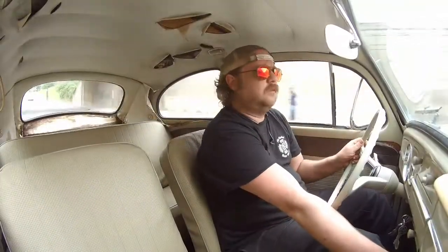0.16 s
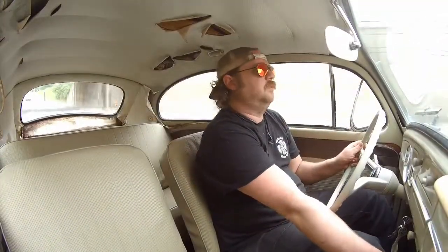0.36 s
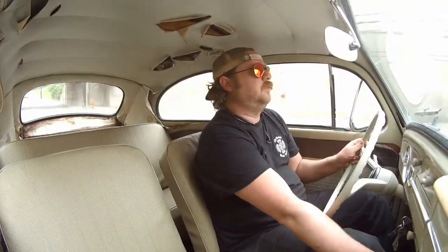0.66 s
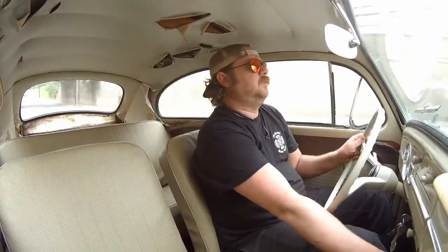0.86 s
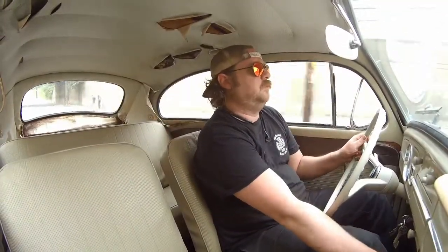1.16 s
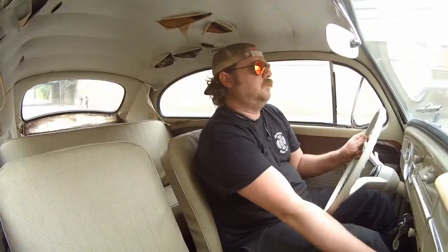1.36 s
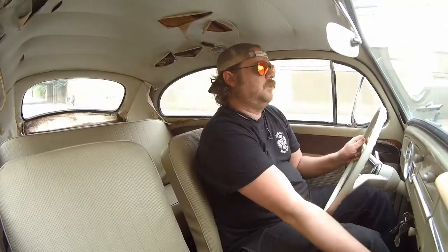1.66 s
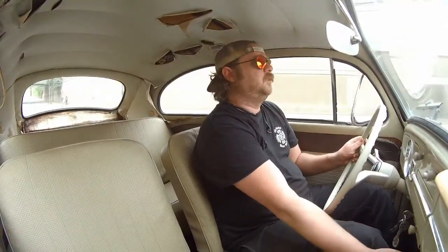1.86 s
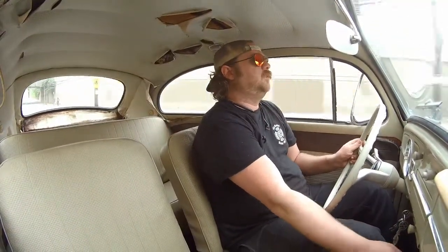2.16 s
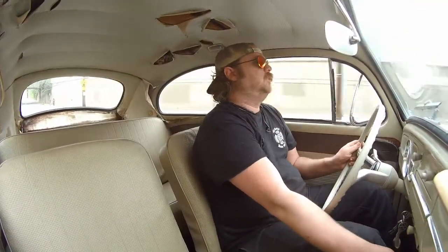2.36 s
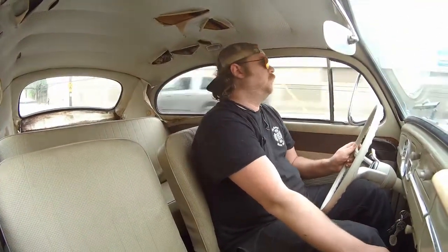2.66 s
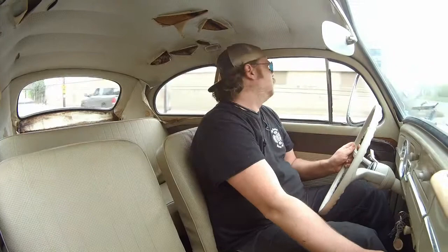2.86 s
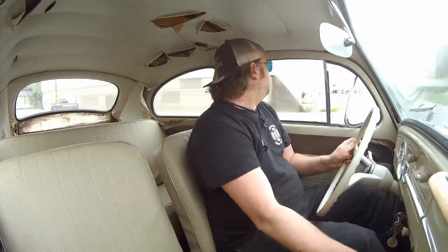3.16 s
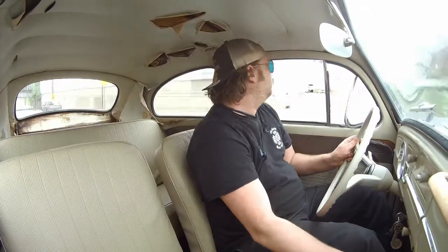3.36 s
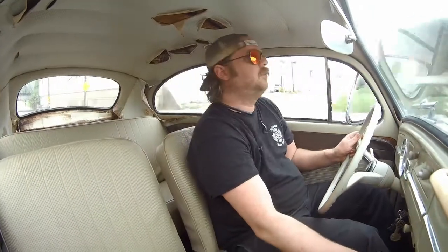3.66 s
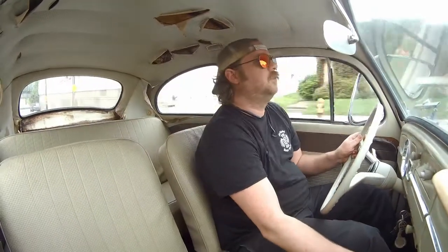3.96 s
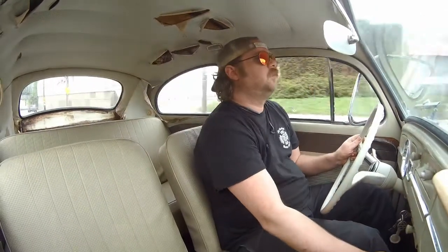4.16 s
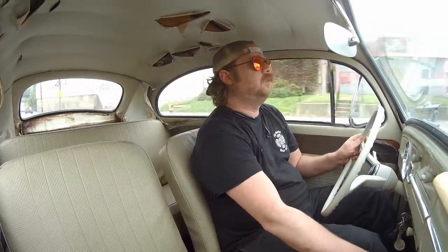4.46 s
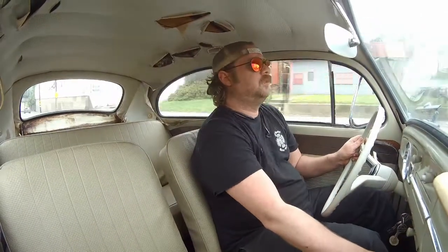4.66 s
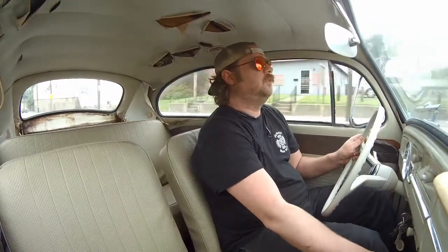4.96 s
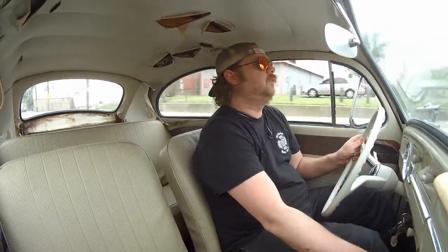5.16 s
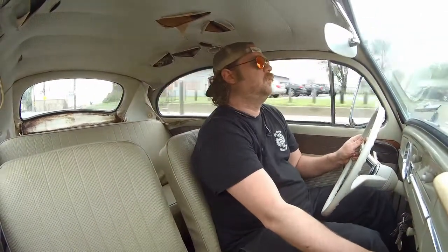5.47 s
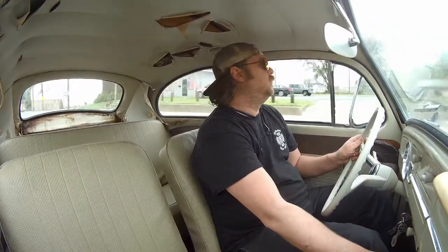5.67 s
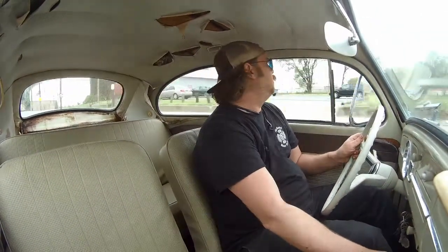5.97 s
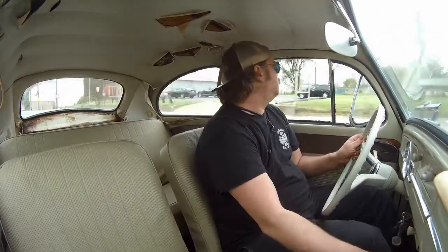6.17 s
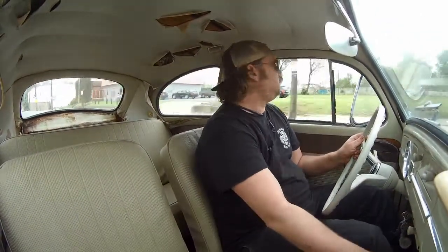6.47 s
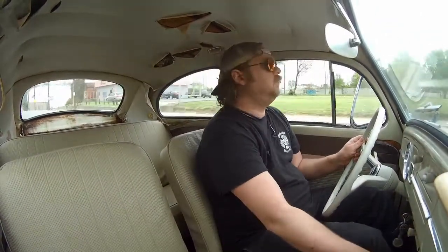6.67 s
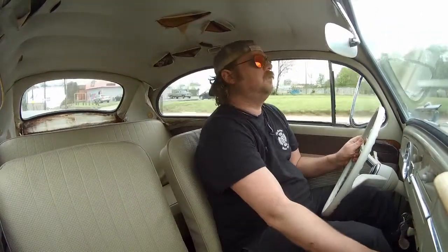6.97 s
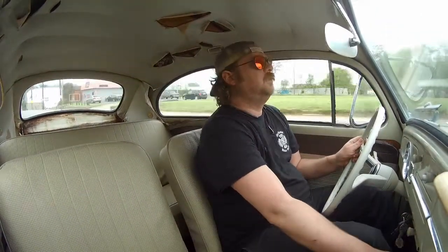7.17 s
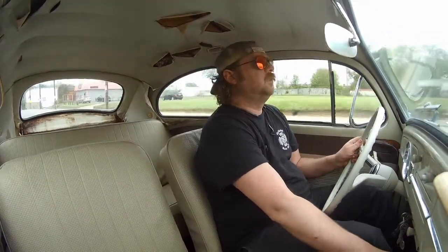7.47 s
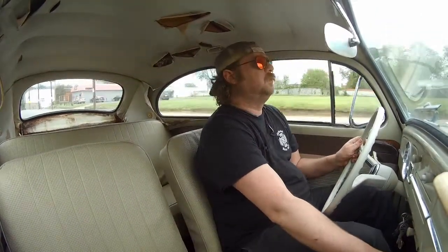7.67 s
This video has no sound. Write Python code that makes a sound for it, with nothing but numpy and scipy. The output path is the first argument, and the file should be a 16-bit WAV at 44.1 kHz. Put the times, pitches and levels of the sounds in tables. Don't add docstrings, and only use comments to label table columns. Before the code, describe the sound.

Inside a small old car at speed, an air-cooled engine drones and eases lower beneath tyre roar, wind hiss and booming bumps.

```python
import sys
import numpy as np
from scipy import signal
from scipy.fft import rfft, irfft, next_fast_len
from scipy.io import wavfile
from scipy.ndimage import uniform_filter1d

SR = 44100
rng = np.random.default_rng(int(sys.argv[2]) if len(sys.argv) > 2 else 0)


def level_to_linear(level):
    exponent = np.asarray(level, float) / 20
    return 10 ** exponent


def digitize_waveform(pressure):
    field = np.atleast_2d(pressure).T
    bounded = np.clip(field, -1, 1)
    quanta = np.round(bounded * 32767).astype(np.int16)
    wavfile.write(sys.argv[1], SR, quanta)


N = 345303

# time_s, cycle_hz
REVS = [
    (0.0, 32.36),
    (1.79, 32.87),
    (2.53, 32.4),
    (3.12, 31.41),
    (4.14, 29.6),
    (5.69, 29.18),
    (6.76, 27.61),
    (7.39, 26.5),
    (7.83, 26.04),
]


def curve(table):
    time_s, value = np.transpose(table)
    return np.interp(np.arange(N) / SR, time_s, value)


def swells(rows):
    t = np.arange(0, N + 64, 64) / SR
    total = sum(height * np.exp(-((t - s) / max(half_s, .01)) ** 2) for s, height, half_s in rows)
    return np.interp(np.arange(N) / SR, t, total)


def walk(rate_hz):
    k = max(int(SR / rate_hz / 64), 1)
    held = np.repeat(rng.standard_normal(N // (64 * k) + 2), k)
    slewed = uniform_filter1d(uniform_filter1d(held, k), k)
    return 1.3 * np.interp(np.arange(N) / 64, np.arange(len(held)), slewed)


def unit_rms(x):
    return x / np.sqrt(np.mean(x ** 2))


def noise(colour, shared_db, flicker_db, flicker_hz):
    size = next_fast_len(N)
    octave = np.log2(np.maximum(np.fft.rfftfreq(size, 1 / SR), 1))
    hz, db = np.transpose(colour)
    colour_db = np.interp(octave, np.log2(hz), db, -200, -200)
    spectrum = rfft(rng.standard_normal(size)) * level_to_linear(colour_db)
    out = 0
    for centre in np.arange(np.floor(np.log2(hz[0])), np.log2(hz[-1]) + 1):
        share = np.cos(np.pi / 2 * np.clip(octave - centre, -1, 1)) ** 2
        octave_band = irfft(spectrum * share, size)[:N]
        out = out + octave_band * level_to_linear(flicker_db * walk(flicker_hz))
    return unit_rms(out * level_to_linear(shared_db))


def band(hz, width_hz):
    edges_hz = [hz - width_hz / 2, hz + width_hz / 2]
    sos = signal.butter(1, edges_hz, "band", fs=SR, output="sos")
    return unit_rms(signal.sosfilt(sos, rng.standard_normal(N)))


def even(x, share):
    return unit_rms(x / uniform_filter1d(x ** 2, SR // 12) ** (share / 2))


def cycle_phase():
    return 2 * np.pi * np.cumsum(curve(REVS) * (1 + .0006 * walk(12))) / SR


def pedal():
    # down_s, up_s, travel_s, level_over_coasting_db
    pulls = [
        (-1, 2.84, 0.19, -0.5),
        (4, 5.79, .15, -0.5),
    ]
    # centre_s, level_db, half_length_s
    take_up = [(4.17, -7, 0.096)]
    t = np.arange(N) / SR
    throttle = 0
    engine_db = 0.37 + swells(take_up)
    for down_s, up_s, travel_s, pull_db in pulls:
        press = np.clip(np.minimum(t - down_s, up_s - t) / travel_s + .5, 0, 1)
        throttle = throttle + press
        engine_db = engine_db + press * pull_db
    return np.clip(throttle, 0, 1), engine_db


def engine(turn):
    # multiple, pull_fast_db, coast_fast_db, pull_slow_db,
    # coast_slow_db
    multiples = [(2, -37, -34, -30, -26), (3, -38, -37, -36, -36), (4, -25, -24.5, -27.5, -23),
                 (5, -41, -45, -26, -33), (6, -31, -38, -28.5, -35), (7, -38, -39, -27.5, -37),
                 (8, -50, -34, -33.5, -34), (9, -29.5, -53, -32.5, -48), (10, -49, -47, -42, -44),
                 (11, -43, -46, -53, -47), (12, -41, -43, -40, -44), (13, -40, -45, -37, -44),
                 (14, -51, -52, -40, -49), (15, -44, -52, -49, -42), (16, -47, -48, -42, -46),
                 (17, -42, -55, -56, -46), (18, -50, -51, -42, -50), (19, -41, -54, -47, -53),
                 (20, -42, -49, -47, -48), (21, -42, -42, -46, -51), (22, -45, -54, -45, -52),
                 (23, -44, -56, -43, -55), (24, -52, -50, -45, -45), (25, -45, -53, -53, -54),
                 (26, -48, -51, -46, -52), (28, -56, -43, -42, -54), (29, -50, -56, -47, -54),
             (30, -46, -56, -50, -44), (31, -51, -56, -48, -56), (35, -60, -58, -58, -47),
             (36, -60, -58, -58, -49), (40, -60, -54, -53, -57), (43, -58, -60, -52, -62),
             (44, -57, -60, -56, -48)]
    # mode_hz, width_hz, level_db
    bulkhead = [(228, 22, 6.5), (210, 9, -6)]
    # centre_s, level_db, half_length_s
    balanced = [(4.35, -11, .33)]
    slow_hz, fast_hz = 29.5, 30.1
    throttle, engine_db = pedal()
    fast = np.clip((curve(REVS) - slow_hz) / (fast_hz - slow_hz), 0, 1)
    coast, slow = 1 - throttle, 1 - fast
    share = np.array([throttle * fast, coast * fast, throttle * slow, coast * slow])
    out = 0
    for k, *stage_db in multiples:
        panel_db = sum(top_db / (1 + (2 * (k * curve(REVS) - mode_hz) / width_hz) ** 2)
                       for mode_hz, width_hz, top_db in bulkhead)
        if k == 4:
            panel_db = panel_db + swells(balanced)
        scatter_db = (.4 + .08 * min(k, 18)) * walk(14)
        gain = level_to_linear(np.array(stage_db)) @ share * level_to_linear(panel_db + scatter_db)
        out = out + gain * np.sin(k * turn - .55 * k * k + .02 * min(k, 18) * walk(14))
    return np.sqrt(2) * out * level_to_linear(engine_db)


def dynamo(turn):
    # multiple, level_db
    whine = [(104.7, -64)]
    # centre_s, level_db, half_length_s
    charging = [
        (4.07, 8, .16),
        (4.55, 7, .09),
        (4.9, 4, .1),
    ]
    _, engine_db = pedal()
    out = 0
    for k, db in whine:
        gain = level_to_linear(db + swells(charging) + 3.5 * walk(5))
        out = out + gain * np.sin(k * turn + .8 * walk(30))
    return np.sqrt(2) * out * level_to_linear(engine_db)


def air():
    # time_s, level_db
    flow = [(0, -2), (.5, -1.5), (1.6, -1), (2.05, -1.4), (2.6, 0), (3.5, -1), (4.3, 0.7), (4.95, -1.3),
            (6, 1), (7, -0.4), (7.5, -0.2), (7.83, -0.5)]
    # centre_s, level_db, half_length_s
    rises_and_dips = [(-0.0, 0.5, 0.015), (0.11, 3, 0.057), (0.18, -1, 0.073), (0.6, -3, 0.015), (0.87, 1.6, 0.024),
                      (1.12, -3.5, 0.021), (1.4, 2.5, 0.066), (1.52, -2, 0.029), (1.71, 1.5, 0.079),
                      (2.11, -3.5, 0.034), (2.81, -1.7, 0.054), (3.0, 1.2, 0.04), (3.14, 2.4, 0.018),
                      (3.18, -1, 0.023), (3.3, 1, 0.074), (3.53, -1, 0.12), (3.97, 1.2, 0.11), (4.46, 1.2, 0.099),
                      (4.76, -1.0, 0.07), (4.94, -2.5, 0.051), (5.22, 1.5, 0.017), (5.71, -1.7, 0.016),
                      (6.17, -2, 0.013), (6.27, 1.0, 0.063), (6.44, -2.4, 0.021), (6.64, 1, 0.043),
                      (6.72, -2, 0.031), (7.21, -2.5, 0.015), (7.41, 2.1, 0.075), (7.76, -0.5, 0.041)]
    # centre_s, level_db, half_length_s
    side_wind = [
        (3.0, 1.2, 1),
        (4.2, 0.8, .4),
    ]
    flow_db, brief_db = curve(flow), swells(rises_and_dips)
    roar_db = -28 + flow_db + 1.1 * brief_db
    hiss_db = -45 + flow_db + brief_db + swells(side_wind)
    return roar_db, hiss_db


def tyre_roar(turn, gust, roar_db):
    # hz, level_db_per_hz
    roar_colour = [(59, -33), (100, -10.5), (134, -3), (168, -6.5), (231, -7.5), (339, -11), (417, -9.5),
                   (582, -15), (651, -15), (843, -14.5), (1270, -20), (1620, -31.5), (1900, -39.5),
                   (2470, -58), (4180, -120)]
    chop_db = .7 * np.cos(turn) + .9 * np.cos(2 * turn) + .7 * np.cos(4 * turn)
    roar = noise(roar_colour, 0.55 * gust + chop_db, 0.27, 25)
    return roar * level_to_linear(uniform_filter1d(roar_db, SR // 16) + 3.0)


def wind_hiss(turn, gust, hiss_db):
    # hz, level_db_per_hz
    hiss_colour = [(940, 6), (1600, -11.5), (2000, -4.5), (2370, -4.5), (2720, -6.5), (3500, -4.5),
                   (3780, -4.5), (4140, -13.5), (4550, -9), (5180, -16.5), (6370, -11.5), (10400, -16.5),
                   (12800, -17), (14900, -25.5)]
    hiss = noise([*hiss_colour, (15000, -28)], 0.7 * gust + 0.27 * np.cos(6 * turn), 0.37, 25)
    return hiss * level_to_linear(hiss_db + 0.14)


def fan(hiss):
    db_per_rev_hz, even_hz = 1, 30.3
    top = signal.sosfiltfilt(signal.butter(1, 7500, "high", fs=SR, output="sos"), hiss)
    fan_db = db_per_rev_hz * np.clip(curve(REVS) - even_hz, -2, 2)
    return hiss + top * (level_to_linear(fan_db) - 1)


def tin_ware(roar_db, hiss_db):
    # mode_hz, width_hz, level_db
    rings = [(2340, 90, -11), (3440, 150, -17), (8250, 440, -18), (10500, 720, -18.5), (1270, 103, -18),
             (655, 34, -12.5), (838, 110, -20)]
    return sum(band(hz, width_hz) * level_to_linear(db + (hiss_db if hz > 2000 else roar_db))
               for hz, width_hz, db in rings)


def road_and_wind(turn):
    roar_db, hiss_db = air()
    gust = walk(16) + 0.62 * walk(45)
    gust = gust - uniform_filter1d(gust, int(.12 * SR))
    hiss = fan(wind_hiss(turn, gust, hiss_db))
    return tyre_roar(turn, gust, roar_db) + hiss + tin_ware(roar_db, hiss_db)


def shaken(rest_db, hits):
    return level_to_linear(rest_db) + swells([(s, level_to_linear(db), half_s) for s, db, half_s in hits])


def shell_boom():
    # hz, level_db_per_hz
    boom_colour = [(11, -30), (16, -10), (21, -4), (25, 0), (30, 0), (35, -4), (41, -4), (46, -11),
                   (54, -30)]
    # centre_s, level_db, half_length_s
    bumps = [(0.18, -9.5, 0.039), (0.348, -20, 0.057), (0.565, -16.4, 0.051), (1.1, -19, 0.12),
             (1.517, -17.5, 0.084), (1.706, -19, 0.046), (1.92, -23.4, 0.152), (2.075, -16, 0.037),
             (2.26, -28, 0.19), (2.72, -25, 0.058), (2.93, -23, 0.18), (3.154, -17.5, 0.056),
             (3.42, -15, 0.11), (3.588, -21, 0.027), (3.73, -17.7, 0.034), (4.08, -22, 0.15),
             (4.243, -19.8, 0.022), (4.5, -18.6, 0.044), (4.85, -17, 0.058), (5.09, -23, 0.025),
             (5.25, -19, 0.024), (5.45, -17, 0.043), (5.87, -23, 0.044), (6.14, -23, 0.11),
             (6.39, -19, 0.076), (7.137, -22.5, 0.072), (7.48, -22.2, 0.046), (7.71, -28, 0.085)]
    return even(noise(boom_colour, 0, 0.36, 4.4), share=0.84) * shaken(-20.5, bumps)


def floor_thuds():
    # hz, level_db_per_hz
    thud_colour = [(36, -41), (47, 1.5), (60, -4.5), (72, 2.5), (85, -2.5), (100, -5), (112, -13.5),
                   (130, -20)]
    # centre_s, level_db, half_length_s
    thuds = [(0.17, -24, 0.025), (0.65, -24, 0.03), (1.41, -31, 0.17), (1.82, -24.5, 0.072),
             (2.29, -29.4, 0.054), (2.41, -23, 0.026), (2.586, -29.1, 0.072), (2.986, -24.6, 0.08),
             (3.44, -25.8, 0.071), (3.577, -18.5, 0.037), (3.82, -30, 0.049), (4.04, -21, 0.094),
             (4.258, -22, 0.029), (4.4, -22, 0.043), (4.61, -23, 0.036), (4.76, -25.5, 0.045),
             (5.05, -28.5, 0.17), (5.26, -29, 0.049), (5.87, -30, 0.146), (6.33, -25.1, 0.11),
             (6.53, -27, 0.034), (6.63, -23, 0.097), (6.91, -21, 0.054), (7.08, -29, 0.053),
             (7.232, -24, 0.044), (7.43, -27, 0.063), (7.55, -21.7, 0.041), (7.69, -18.8, 0.07)]
    return even(noise(thud_colour, 0, 0.22, 15), share=0.72) * shaken(-24.5, thuds)


def scene():
    turn = cycle_phase()
    motor = engine(turn) + dynamo(turn)
    return (motor + road_and_wind(turn) + shell_boom() + floor_thuds())[None]


def band_limit(x):
    return signal.sosfilt(signal.butter(12, 15030, fs=SR, output="sos"), x)


def record(dry):
    # start_s, length_ms, stop_pressure (0-1)
    pinned = [(0.166, 11, 0.9), (0.4953, 6.4, 0), (0.9455, 2.2, 0.1), (0.9498, 0.96, 0.05),
              (0.9514, 2.1, -0.0), (1.4766, 0.88, 0), (1.477, 4.3, 0), (1.9333, 1.1, 0.1),
              (2.0704, 1.3, 0.26), (2.3627, 2.44, 0.21), (3.1641, 4.1, 0.2), (3.187, 1.6, 0.1),
              (3.1902, 5.8, 0.1)]
    t = np.arange(N) / SR
    free = np.ones(N, bool)
    jolt = np.zeros(N)
    for start_s, length_ms, pressure in pinned:
        end_s = start_s + length_ms / 1000
        free &= (t < start_s) | (t > end_s)
        height = (pressure - dry[0, int(start_s * SR)]) * min(length_ms / 4, 1)
        jolt += height * np.exp(-((t - start_s) / .006) ** 2) * (t < end_s)
    x = dry[0] + jolt
    x = np.interp(t, t[free], x[free])
    x = signal.sosfilt(signal.butter(2, 15, "high", fs=SR, output="sos"), x)
    x = 0.93 * np.tanh(x / 0.82)
    return band_limit(x[None])


dry = scene()
out = record(dry)
digitize_waveform(out)
```